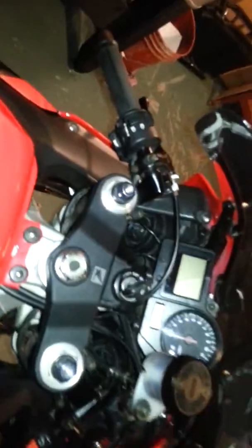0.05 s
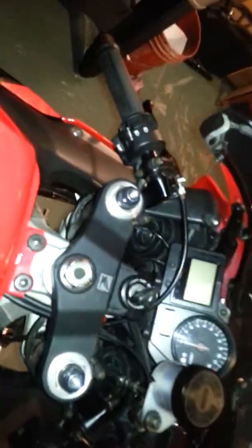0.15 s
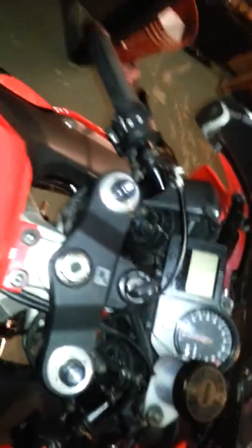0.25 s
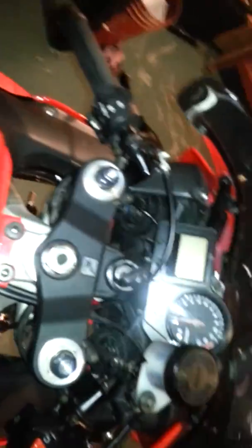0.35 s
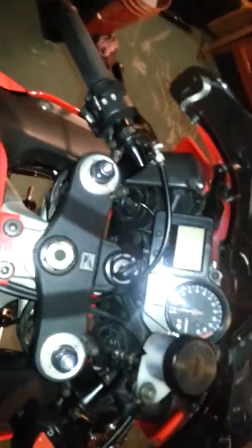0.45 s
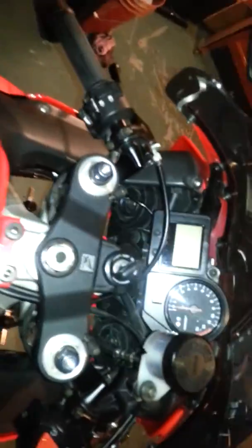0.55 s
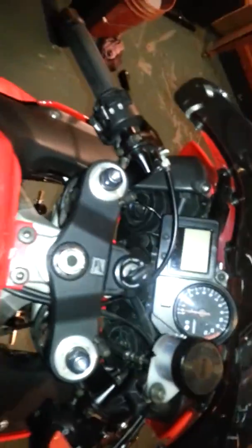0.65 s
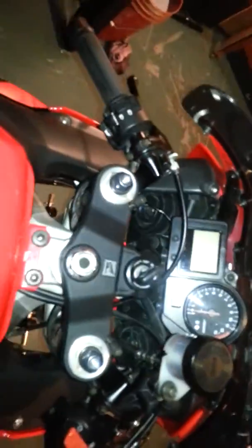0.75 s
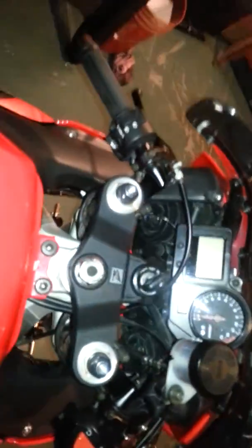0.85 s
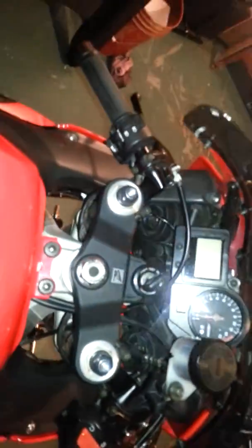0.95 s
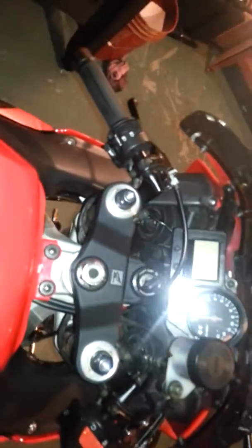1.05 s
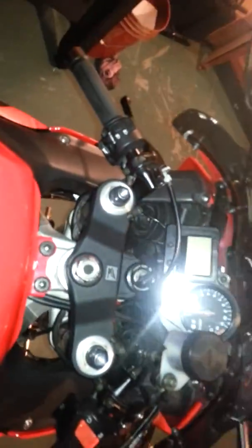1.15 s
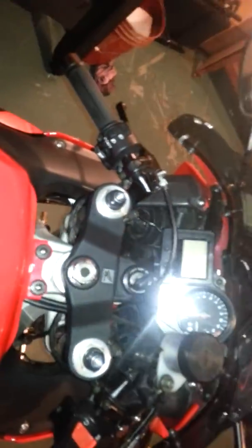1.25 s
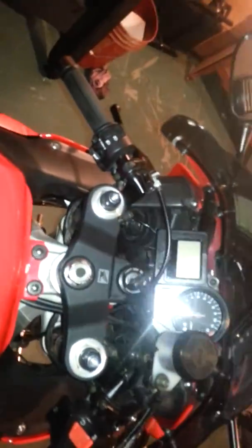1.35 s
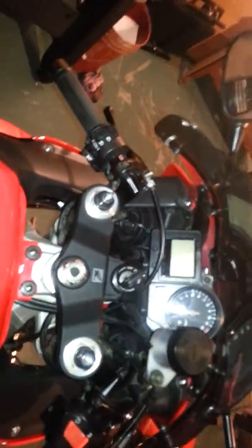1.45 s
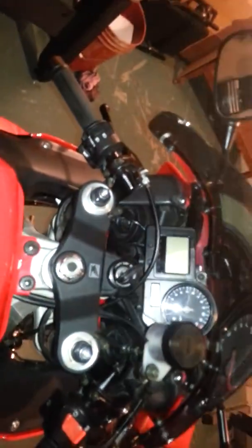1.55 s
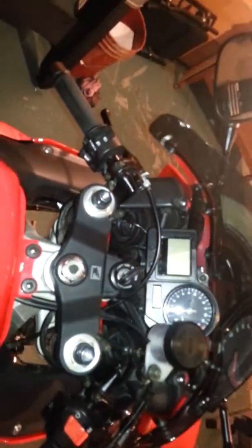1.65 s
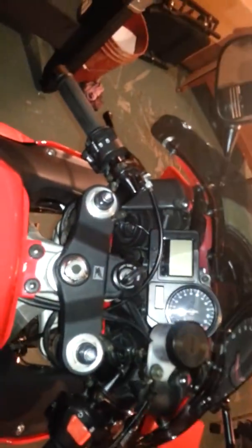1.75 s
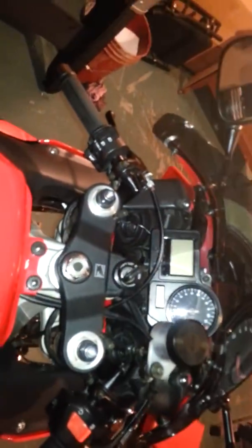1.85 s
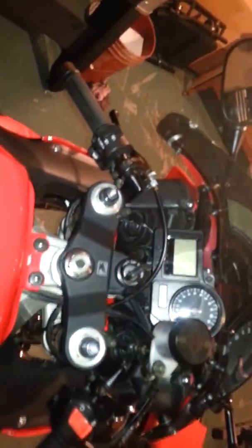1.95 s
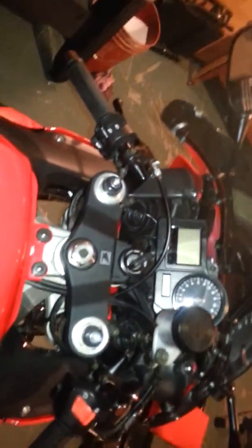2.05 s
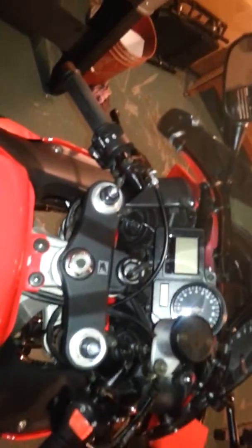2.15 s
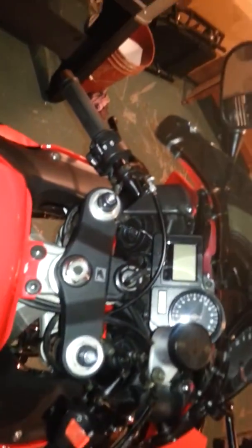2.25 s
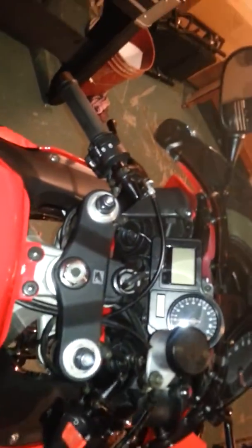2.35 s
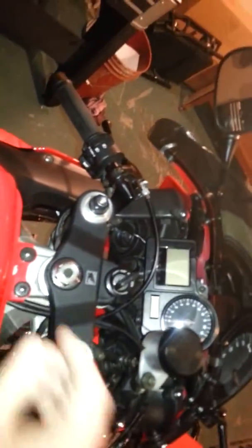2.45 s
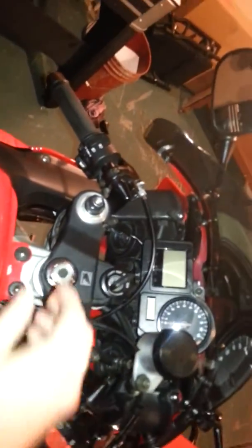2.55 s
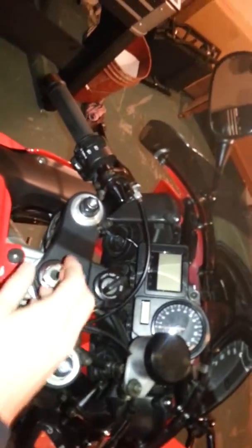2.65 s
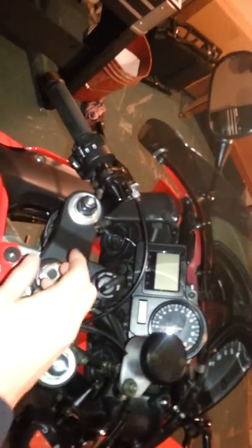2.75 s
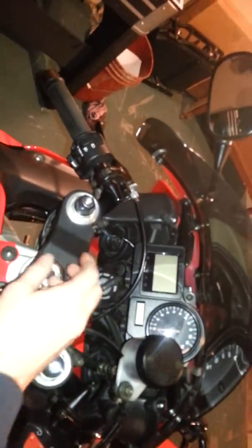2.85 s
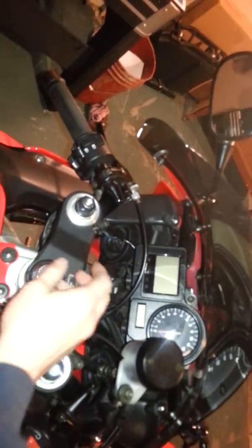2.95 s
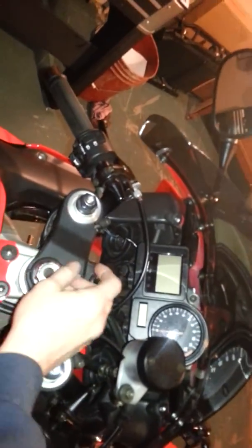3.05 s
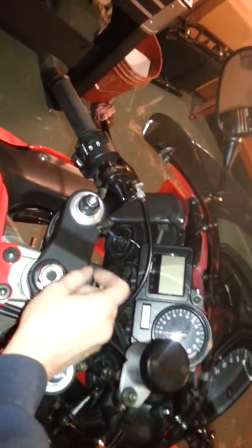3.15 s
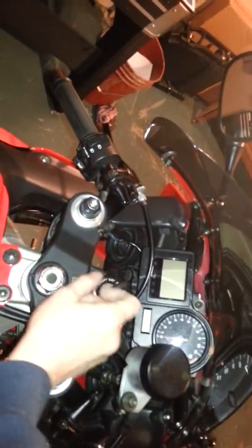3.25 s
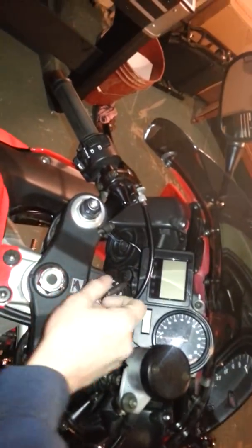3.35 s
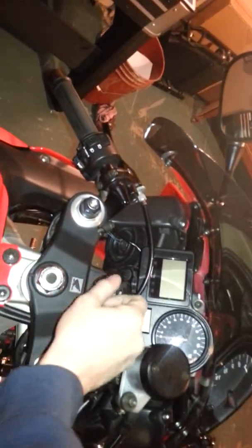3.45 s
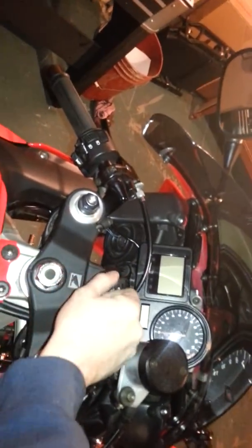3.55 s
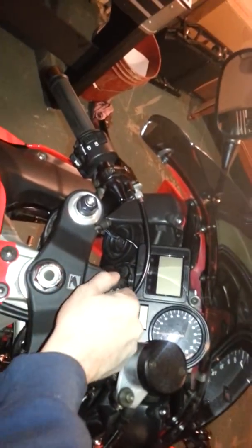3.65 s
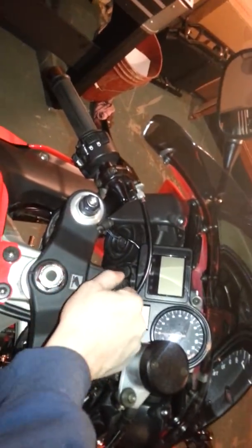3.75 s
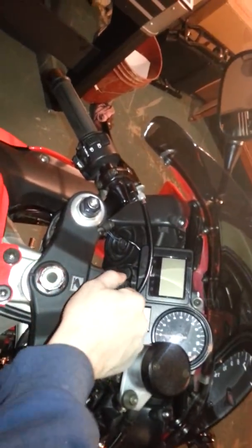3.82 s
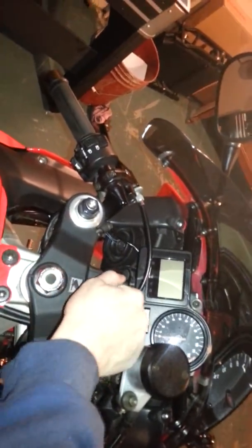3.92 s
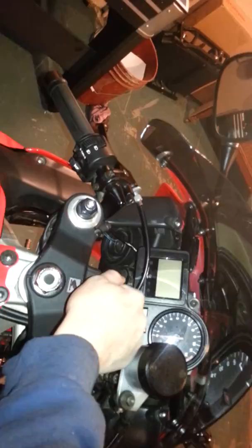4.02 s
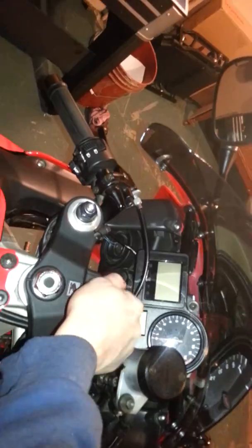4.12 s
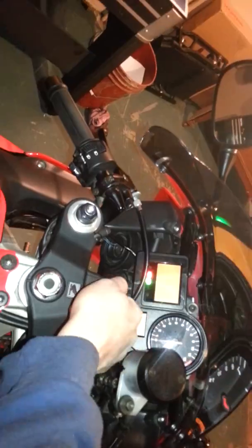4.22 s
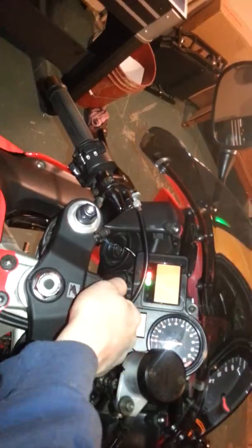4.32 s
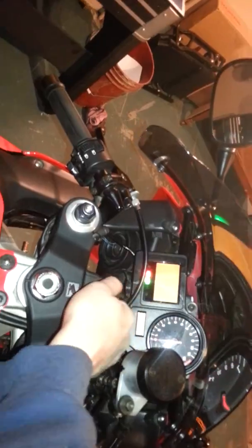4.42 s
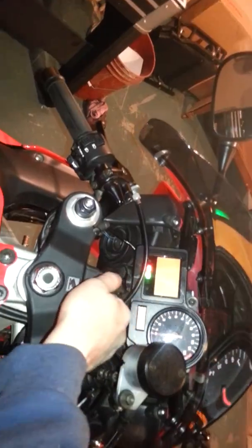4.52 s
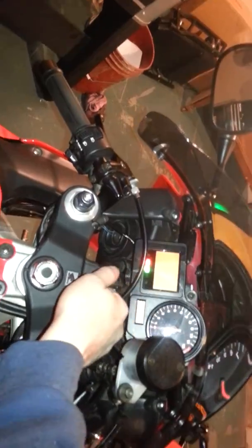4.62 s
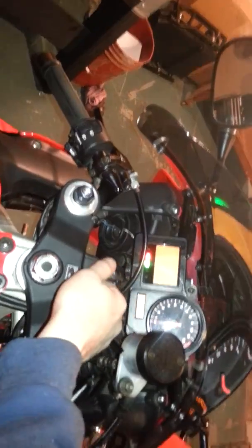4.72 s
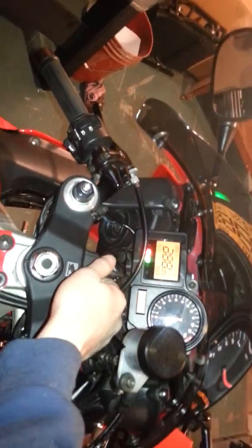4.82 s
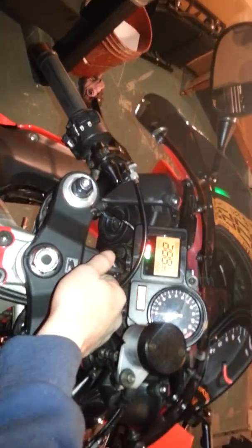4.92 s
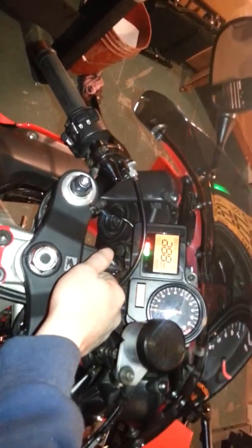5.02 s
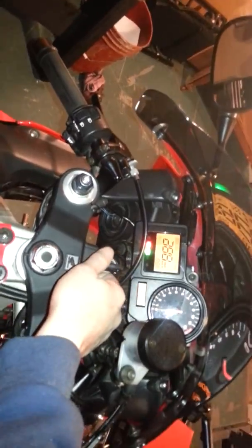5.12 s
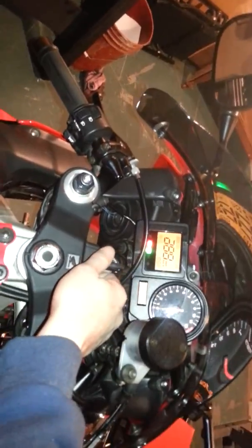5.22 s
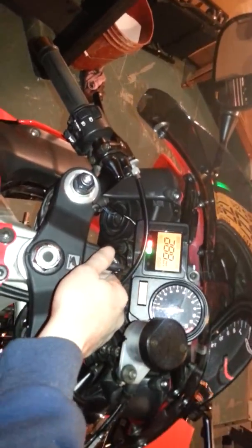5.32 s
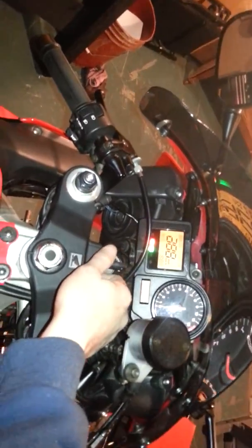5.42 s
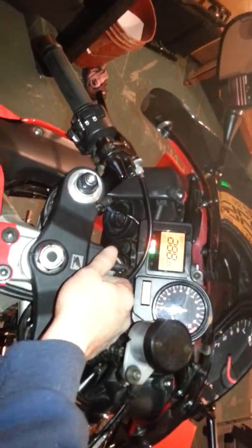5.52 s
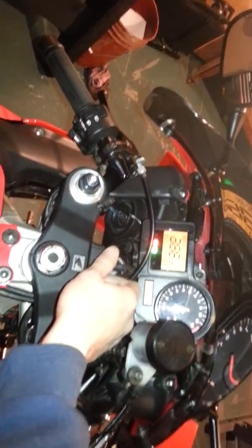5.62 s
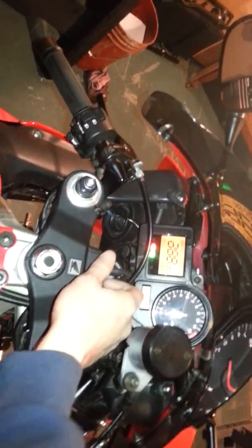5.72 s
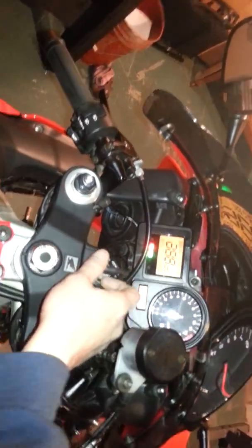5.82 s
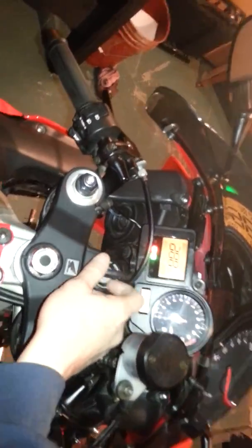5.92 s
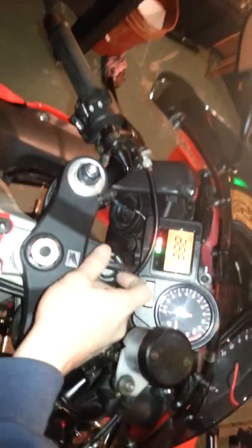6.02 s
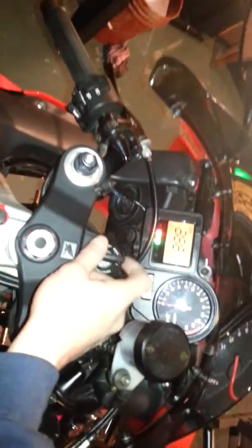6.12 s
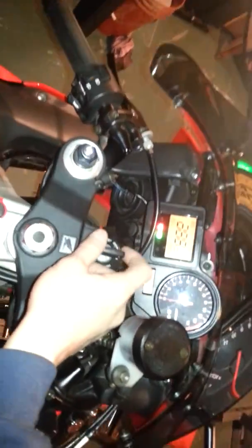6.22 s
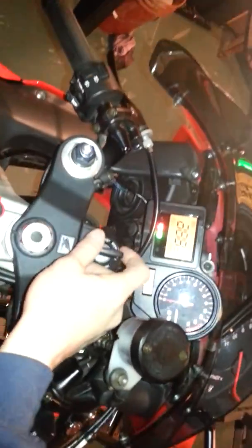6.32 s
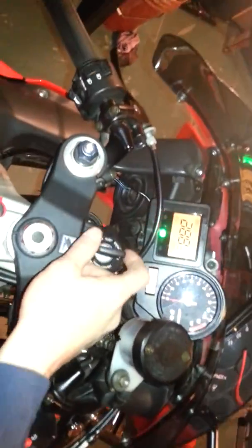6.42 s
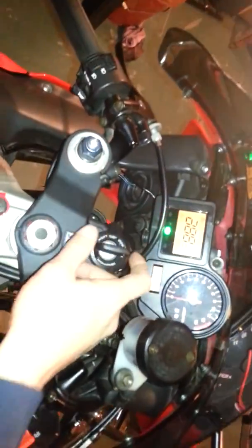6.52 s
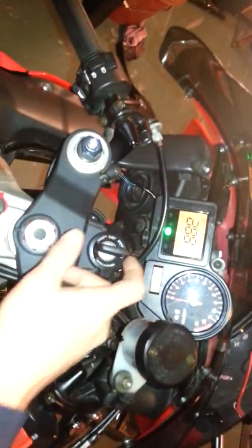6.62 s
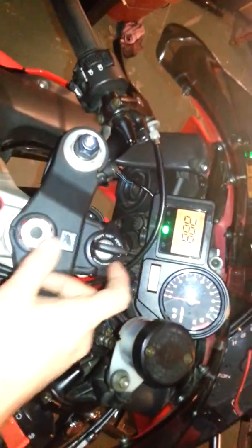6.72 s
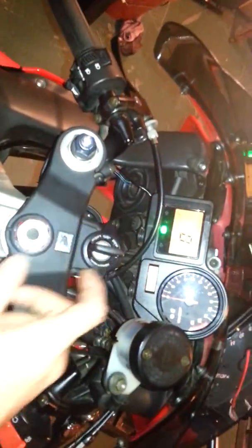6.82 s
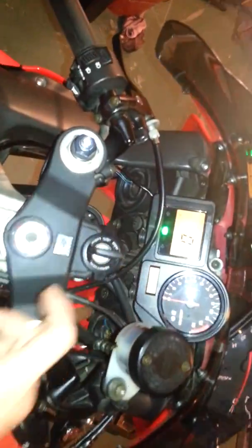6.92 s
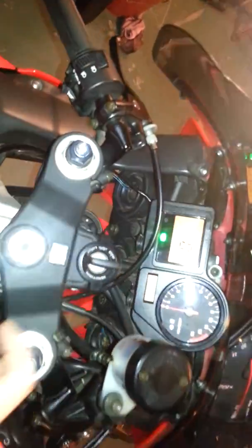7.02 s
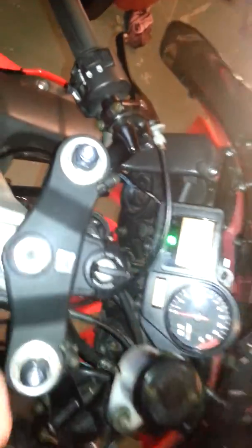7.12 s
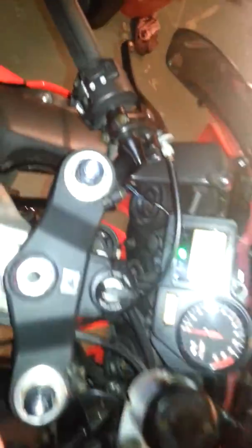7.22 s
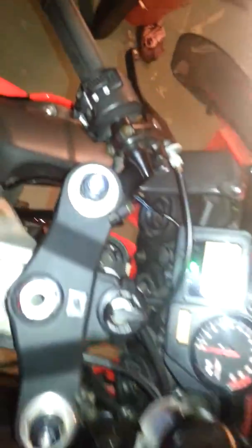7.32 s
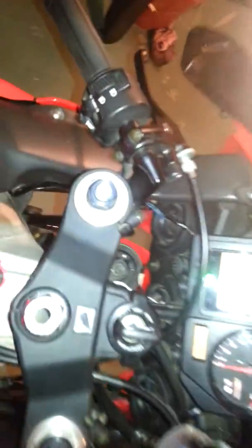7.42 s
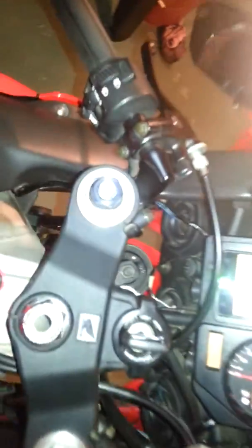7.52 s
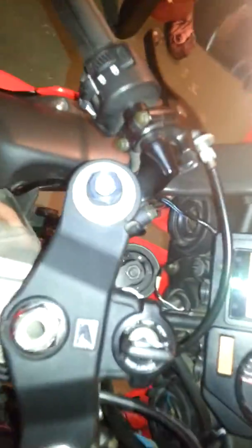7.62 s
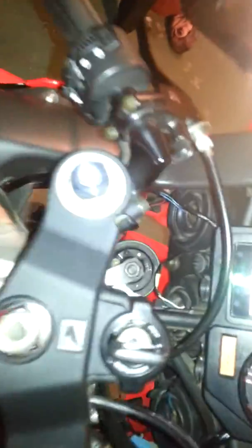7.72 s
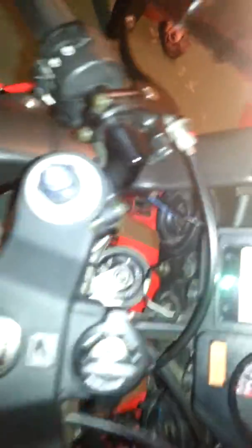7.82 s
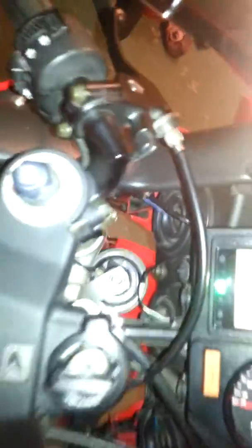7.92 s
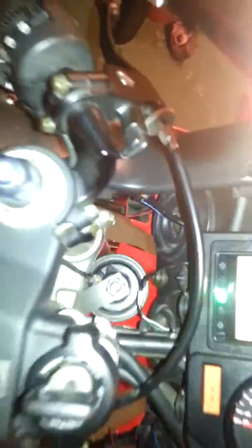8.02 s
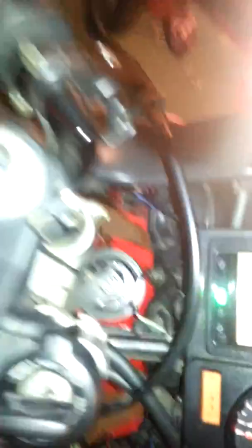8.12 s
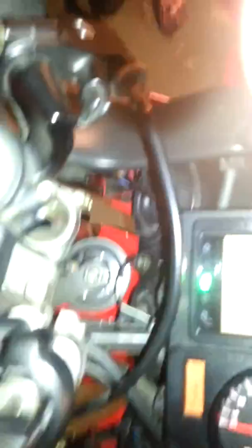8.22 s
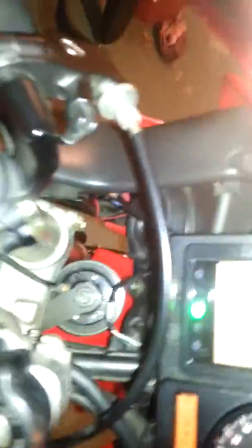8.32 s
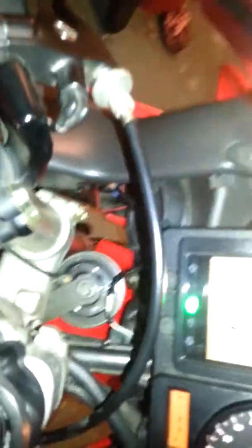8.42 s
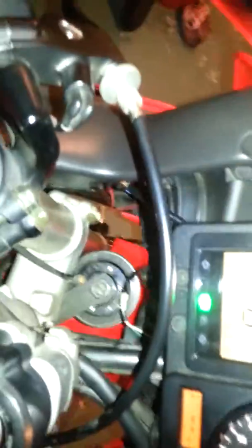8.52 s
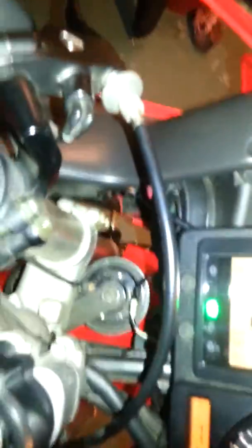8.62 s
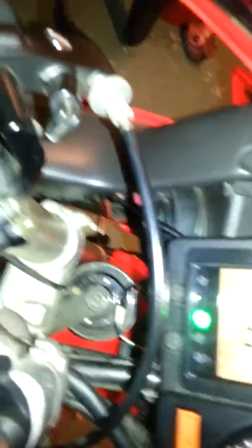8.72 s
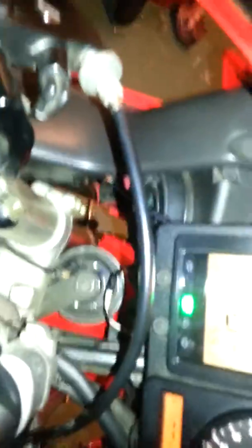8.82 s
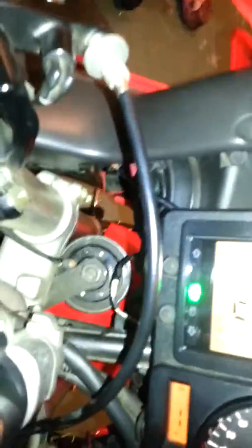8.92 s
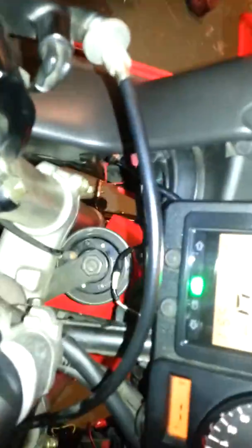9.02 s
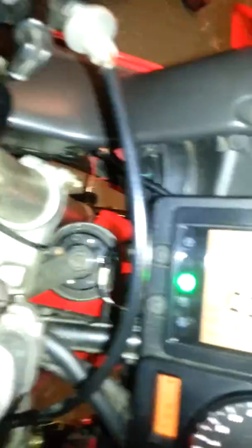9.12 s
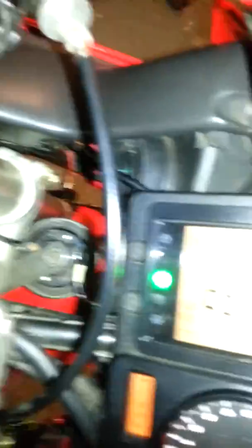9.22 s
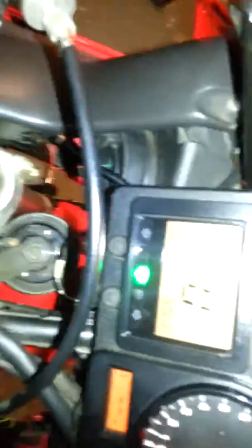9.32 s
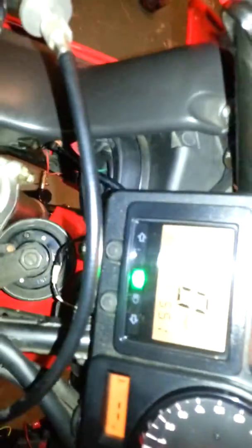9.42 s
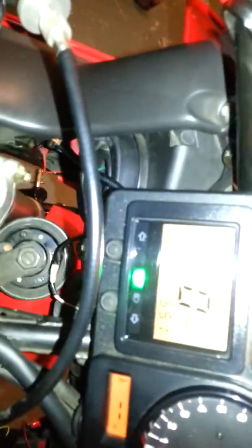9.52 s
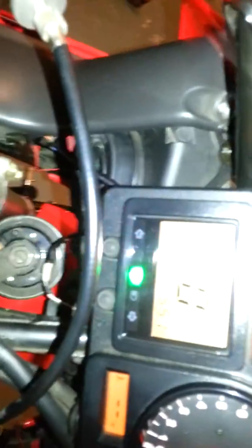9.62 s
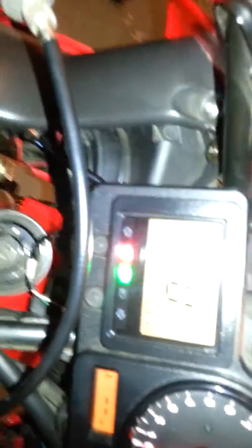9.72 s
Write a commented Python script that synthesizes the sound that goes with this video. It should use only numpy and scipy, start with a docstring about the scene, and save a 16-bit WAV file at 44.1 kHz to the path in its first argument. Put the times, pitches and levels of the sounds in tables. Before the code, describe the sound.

Phone-case rubbing and clicks, then a key turns and a motorcycle fuel pump whines for two seconds and runs down before more handling noise.

```python
"""A quiet garage: a hand turns a motorcycle's ignition key; a phone with two microphone ports listens.
The electric fuel pump spins up, whines and runs down: sines at multiples of its shaft rate, with echoes.
Fuel churns as shaped noise; key and lock are cracks of noise that ring a set of modes.
Close to the microphones, fingers slide over the phone's case in grainy noise; it ticks and creaks.
Behind it all lie a low rumble from the holding hand, a faint hush and two fuzzy tones."""
import sys
import numpy as np
from scipy import signal
from scipy.io import wavfile
from scipy.ndimage import uniform_filter1d

SR = 44100
rng = np.random.default_rng(int(sys.argv[2]) if len(sys.argv) > 2 else 0)


def master_out(mix):
    """Clip the mix to full scale and print it as 16-bit PCM to the path in sys.argv[1]."""
    frames = np.transpose(np.atleast_2d(mix))
    ceiling = np.clip(frames, -1, 1)
    pcm = np.round(ceiling * 32767).astype(np.int16)
    wavfile.write(sys.argv[1], SR, pcm)


N = 430416
T = np.arange(N) / SR

# Pump: strong shaft orders, namely the commutator tone, its octave and the impeller blade tone
# (multiple of the shaft rate)
LOUD_ORDERS = (8, 16, 47)
# Pump: weaker shaft orders before fading, {multiple of the shaft rate: (left level [dB], right level [dB])}
WEAK_ORDERS = {2: (-67, -66), 4: (-58, -59), 24: (-71, -62), 32: (-72, -60), 43: (-65, -64), 44: (-61, -58),
               45: (-65, -53), 46: (-69, -59), 48: (-58, -51), 49: (-64, -57), 50: (-72, -65),
               94: (-82, -74), 141: (-75, -63), 142: (-83, -70)}
# Pump: the shaft orders from 25 to 42 are faintly there, at (left, right) middle levels [dB]
FINE_ORDERS, FINE_DB = range(25, 43), (-78, -71)
# Pump: two tones that come and go at each port as the phone sways
# (time [s], commutator octave left [dB], right [dB], blade tone left [dB], right [dB])
SWAY = [(4.43, -59, -59, -74, -56), (4.465, -61, -56, -55, -44.5), (4.5, -60, -50, -47, -41.5),
        (4.56, -65, -58, -44, -35), (4.61, -75, -55, -53, -44.5), (4.8, -85.5, -54.5, -58, -41.5),
        (5.18, -78, -60, -48.5, -65), (5.42, -81, -58, -47.5, -51), (5.62, -62, -57.5, -39, -39.5),
        (5.84, -71, -73, -45, -36), (5.96, -51, -79, -47, -37.5), (6.07, -52.5, -66, -60, -39),
        (6.18, -48.5, -59, -50.5, -48), (6.43, -46.5, -52, -46, -41), (6.46, -51.5, -49, -45.5, -46),
        (6.56, -66, -74, -74, -68)]
# Pump: gets current, loses it, and is too slow to sing
ON_S, OFF_S, REST_S = 4.385, 6.432, 6.56
# Pump: time scale and curve of the spin-up; time to coast to half speed
SPIN_UP_S, SPIN_UP_SHAPE, COAST_S = .064, 1.5, .055
# Pump: fuel pressure builds and pulls the shaft down to its loaded turns per second
LOADED_RPS, SAG_RPS, SAG_S = 92.35, 1.86, 1.0
# Pump: commutator tone; its gain under full pressure and at standstill
HUM_DB, HUM_LOAD_DB, HUM_SLOW_DB = -52, 5, -23
# Pump: the overtones of the blade tone grow with the pressure
OVERTONE_LOAD_DB = 14
# Tank wall: a narrow mode
WALL_HZ, WALL_WIDTH_HZ = 4350, 7

# Fuel churning in the tank (time [s], rush level [dB], low boom level [dB])
CHURN = [(4.425, -58, -52), (4.439, -58, -46), (4.49, -48.5, -39.5), (4.53, -50, -53), (4.7, -51.5, -65),
         (6.4, -52, -62), (6.45, -52, -50.5), (6.51, -56, -49), (6.6, -61, -51.5), (6.85, -69, -69)]
# Spectrum of the rush (frequency [Hz], relative level [dB per Hz])
RUSH_SPECTRUM = [(150, -17), (400, -2), (1100, -3.5), (2500, -0.5), (4200, 5), (5600, -8), (14500, -9.5)]
# Low resonances of the tank (frequency [Hz], width [Hz], relative level [dB])
TANK_MODES = [(281, 130, -2.5), (527, 360, -25), (1010, 67, -12)]

# Key and lock clicks (time [s], nominal peak [dB], treble re level [dB], crack [ms], ring re level [dB],
# pitch of the part struck [Hz])
KEY_CLICKS = [(3.047, -30.5, -8, 1.4, -5, 1300), (3.083, -23, -18, 2.5, -1, 1110),
              (3.254, -43.5, 4, 0.66, -3, 1612), (4.05, -42, 4, 3.2, 13, 8500),
              (4.065, -39.5, -2, 4.6, -6, 4200), (4.09, -38, -10, 1.7, -10, 3200),
              (4.102, -42, -4, 3.2, 7, 3300), (4.195, -19, 2, 3.8, -5, 700)]
# Ringing of the lock (frequency [Hz], relative level [dB], t60 [s])
LOCK_MODES = [(363, -1, 0.24), (645, -1.5, 0.15), (700, -2, 0.15), (1020, -13, 0.27), (1137, 4.5, 0.028),
              (1610, 9, 0.025), (3350, 4, 0.024), (4070, -2, 0.05), (8500, 9, 0.012)]

# Finger strokes (time of the middle [s], length [ms], level [dB], left-right [dB],
# then re that level: upper middle [dB], treble [dB], bass [dB])
STROKES = [(0.134, 36, -57.5, -25, 12, 12, -8), (0.18, 82, -56.5, -27, 7, 6, 1),
           (0.413, 78, -49.5, -11, -5, -11, -1), (0.478, 89, -39, -29, 4, 1.5, -6),
           (0.721, 100, -54.5, -25, 5, 4, -0.5), (0.954, 118, -52.5, -25, -5.5, -20, -1.5),
           (1.026, 59.26, -47.5, -25, 0, -5.5, -7), (1.205, 27, -43.5, -23, -2, -7, -24),
           (1.264, 66.96, -48, -21, 0.5, -4, -11), (1.391, 104, -44.5, -33, 0.5, -1.5, -12.5),
           (1.56, 122, -40.5, -33, -1.5, -5, -14), (1.623, 99, -31.5, -37, -1.5, -3, -11),
           (1.731, 83, -38, -36, 0, -5.5, -11.5), (1.836, 22.22, -59, -25, 11, -10, -10),
           (1.924, 39.81, -53, -21, 3, -4, 2), (2.05, 68.6, -53, -12, 3.5, -3, 3.5),
           (3.85, 79.7, -68.5, -4, -1, -4, 14.5), (3.96, 140.4, -66, -4.5, 4, -2, 7),
           (7.034, 111.2, -59, -25, 3.5, -1, -3), (7.846, 23.76, -45, -11, -5, -11, 3),
           (7.92, 79.92, -48, -10, -0.5, -7, -5.5), (7.933, 27.78, -47.5, 25, 4, -16, -10),
           (8.173, 37.6, -33.5, -18, 0, -7, -12), (8.22, 55, -44.5, -8, -7.5, -14, -9),
           (8.325, 86, -53.5, -1, -2, -9, -2), (8.447, 96, -38.5, -12.5, -3, -6.5, -7.5),
           (8.58, 100, -50.5, 6, 2, 3, 3.5), (8.641, 46, -36, -20, -6.5, -17, -7),
           (8.704, 51, -44, 25, 5.5, 3.5, 9), (8.713, 66.67, -42.5, -25, -12, -11, 1.5),
           (8.876, 59.5, -41, -25, 3.5, 0, -2.5), (9.01, 83.33, -56, 3, 5, 6, -10),
           (9.103, 138, -47, -18, 1, 2, -6.5), (9.306, 94, -45, -29, -0.5, 2.5, -6.5),
           (9.68, 140, -62.5, 7, 5.5, 7.5, 3)]
# Bands of a stroke: middle, upper middle, treble, bass (from [Hz], to [Hz])
STROKE_BANDS = [(1520, 2590), (2730, 5090), (6360, 8880), (170, 1100)]
# Each band of a stroke wavers on its own as the skin catches and lets go
UNEVEN_DB, UNEVEN_S = 1.4, .015
# Hand that holds the phone (time [s], low rumble [dB], faint steady rubbing by the right port [dB])
GRIP = [(0, -59.5, -62.5), (1.9, -59, -57), (2.3, -62.5, -79), (4.2, -62, -67), (4.8, -70, -72),
        (6.3, -66, -73), (7.7, -64, -93), (8.1, -59.5, -59.5), (8.7, -57, -48.5), (9.76, -61, -60.5)]

# Ticks of the case (nominal time [s], nominal peak [dB], treble re level [dB], bass re level [dB])
TICKS = [(0.389, -49.5, -12, 16), (0.631, -55.5, 31, -30), (1.091, -49, -5, 7), (1.116, -52, 12, 12),
         (1.3848, -38.5, 5, 0), (1.6112, -23.5, 7.5, 15.5), (1.619, -22, 2, -12), (1.665, -41.5, 16, -23),
         (2.1108, -53, 3, 16.5), (2.169, -56.5, 3, 10), (3.014, -49, -15, 15.5), (4.5825, -25, 0.5, -5),
         (5.5836, -33, -10, 6.5), (6.54, -42.5, -12, 13), (6.9131, -42.5, 12.5, -3),
         (7.0232, -25.5, 2.5, -0.5), (7.7682, -26, 5.5, 0), (7.8452, -33, 0, -11), (7.8785, -23, 5, 1.5),
         (7.9668, -25, 2, 1.5), (8.059, -47.5, -8, -5), (8.295, -40.5, -4, 3), (8.366, -48, -5, 5),
         (9.1403, -36, -10, -32), (9.549, -55.5, 15, -26), (9.6696, -35, 9, 1)]
# Ringing of the case (frequency [Hz], relative level [dB], t60 [s])
TICK_MODES = [(1110, 5, 0.0038), (2286, 13, 0.0026), (3750, 9, 0.0018), (6940, -26, 0.009)]
TICK_FAR_DB = -27.5  # the left port lies far from the seam that ticks
# Creak of the case (time [s], pitch [Hz], level [dB])
CREAK = [(9.261, 1360, -45), (9.268, 1170, -43.5), (9.277, 696, -39.5), (9.291, 636, -47),
         (9.297, 270, -54), (9.318, 239, -56)]

# Spectrum of the hand's rumble (frequency [Hz], relative level [dB per Hz])
RUMBLE_SPECTRUM = [(20, -15), (50, -6.5), (100, -4), (119, -0.5), (140, -1), (200, -12), (320, -26.5)]
# Spectrum of the hush (frequency [Hz], relative level [dB per Hz])
HUSH_SPECTRUM = [(120, -33), (200, 2), (509, -5), (556, -7), (1270, -13.5), (1630, -12), (2260, -17),
                 (4310, -17), (5640, -21), (14600, -20)]
HUSH_DB = -60.5
# Likeness of the hush at the two ports (frequency [Hz], correlation)
HUSH_SAME = [(60, 0.2), (380, 0.2), (2380, 0.021), (15000, 0.03)]
# Balance of the hush (frequency [Hz], left-right [dB])
HUSH_TILT = [(60, 3), (240, -1.5), (950, 1.5), (3770, -11.5), (15000, -9.5)]
# Fuzzy tones that hang in the quiet (frequency [Hz], width [Hz], level [dB], heard from [s])
FAINT_TONES = [(1570, 54, -65, 8.5), (4350, 90, -71.5, 2)]

# Echo of the garage (frequency [Hz], t60 [s])
GARAGE_T60 = [(250, 0.81), (1000, 0.49), (4000, 0.36), (12000, 0.19)]
EDGE_HZ = 14550  # upper band limit of the phone


def amp(db):
    """Turns decibels into a factor of amplitude."""
    return 10 ** (np.asarray(db) / 20)


def evened(x):
    """Scales each row to rms 1."""
    return x / np.sqrt(np.mean(x ** 2, axis=-1, keepdims=True) + 1e-20)


def read(points, hz):
    """Reads a curve of (frequency, value) points along a logarithmic frequency axis."""
    point_hz, value = np.transpose(points)
    return np.interp(np.log(hz + 1), np.log(point_hz + 1), value)


def add(mix, s, sound):
    """Lays a two-port sound into the mix at s seconds, cut off at the end of the mix."""
    part = mix[:, round(s * SR):][:, :sound.shape[1]]
    part += sound[:, :part.shape[1]]


def butter(x, order, hz, kind):
    """Butterworth filter."""
    return signal.sosfilt(signal.butter(N=order, Wn=hz, btype=kind, fs=SR, output="sos"), x)


def band(x, lo_hz, hi_hz):
    """Band of a sound, scaled to rms 1."""
    return evened(butter(x, 3, [lo_hz, hi_hz], "band"))


def resonate(x, hz, width):
    """Shifts hz down to zero, smooths, and shifts back: a resonance of gain 1."""
    turn = np.exp(2j * np.pi * np.cumsum(hz * np.ones(x.shape[-1])) / SR)
    r = np.exp(-np.pi * width / SR)
    return 2 * (turn * signal.lfilter([1 - r], [1, -r], x / turn)).real


def ring(modes, weights_db, t):
    """Struck solid: a sum of dying sines."""
    total = 0
    for (hz, db, t60), weight_db in zip(modes, weights_db):
        total = total + amp(db + weight_db - 60 * t / t60) * np.sin(2 * np.pi * hz * t)
    return total


def wander(t, top_hz):
    """Slow random drift of rms 1, different at each port: a sum of slow sines."""
    hz = np.geomspace(.6, top_hz, num=10)[:, None]
    sines = np.sin(2 * np.pi * (hz * t + rng.random((2, 10, 1))))
    return evened((sines / np.sqrt(hz)).sum(axis=1))


def coloured(spectrum, same, tilt, patchy_db):
    """Noise at two ports from random short-time spectra whose level varies in patches."""
    frames, hz = N // 256 + 5, np.fft.rfftfreq(1024, 1 / SR)
    a, b, c, d, patches = rng.standard_normal((frames, 513, 5)).T
    patches = uniform_filter1d(uniform_filter1d(patches, size=12, axis=0), size=14, axis=1)
    level_db = read(spectrum, hz)[:, None] + patchy_db * patches / patches.std()
    same = np.clip(read(same, hz), -1, 1)[:, None]
    half_tilt = amp(read(tilt, hz)[:, None] / 2)
    left = a + 1j * b
    right = same * left + np.sqrt(1 - same ** 2) * (c + 1j * d)
    z = np.array([left * half_tilt, right / half_tilt]) * amp(level_db)
    x = signal.istft(z, nperseg=1024, noverlap=768)[1][:, :N]
    return x / x.mean(axis=0).std()


def garage(x):
    """Sparse echoes of random sign, each band dying at its own speed, other ones at each port."""
    taps = np.zeros((2, SR // 2))
    at = np.arange(200, SR // 2 - 20, 20) + rng.integers(0, 20, (2, (SR // 2 - 201) // 20))
    np.put_along_axis(taps, at, rng.choice([-1., 1.], at.shape), 1)
    hz, t, z = signal.stft(taps, SR, nperseg=256)
    tail = signal.istft(z * amp(-60 * t / read(GARAGE_T60, hz)[:, None]), SR, nperseg=256)[1]
    return signal.oaconvolve(x, tail / np.linalg.norm(tail[0]), axes=1)[:, :N]


def pump():
    """Shaft orders as sines on one turning angle; tones fade in and out at each port as the phone sways."""
    s, *sway_db = np.transpose(SWAY)
    t = np.arange(s[0], REST_S, 1 / SR)
    load = 1 - np.exp(-(np.minimum(t, OFF_S) - ON_S) / SAG_S)
    spin_up = 1 - np.exp(-((t - ON_S) / SPIN_UP_S) ** SPIN_UP_SHAPE)
    spin = spin_up / (1 + np.maximum(t - OFF_S, 0) / COAST_S)
    slow = 1 - spin
    angle = 2 * np.pi * np.cumsum(spin * (LOADED_RPS + SAG_RPS * (1 - load))) / SR

    hum_db = HUM_DB + HUM_LOAD_DB * load + HUM_SLOW_DB * slow + np.zeros((2, 1))
    octave_db, blade_db = np.reshape([np.interp(t, s, c) for c in sway_db], (2, 2, -1))
    tones = 0
    for k, db in zip(LOUD_ORDERS, [hum_db, octave_db, blade_db]):
        # short waves reach the ports out of step
        apart = np.array([[0], [np.exp(-400 / k ** 2) * np.pi / 2]])
        # off speed the rotor judders, in level and in phase
        shake = evened(uniform_filter1d(rng.standard_normal((2, len(t))), size=260))
        level = amp(db + 28 * np.clip(slow, 0, .25) * shake)
        tones = tones + level * np.sin(k * angle + apart + 6.5 * slow * shake[::-1])

    for k, db in WEAK_ORDERS.items():
        short = np.exp(-400 / k ** 2)  # near 1 for short waves, which differ more between the ports
        fade = np.repeat(wander(t[::100], top_hz=3), 100, axis=1)[:, :len(t)]
        fade_db = (1 + 3 * short) * uniform_filter1d(fade, size=100)
        level = amp(np.array(db)[:, None] + fade_db - 18 * slow - 2 * short)
        if k > 1.5 * LOUD_ORDERS[-1]:  # an overtone of the blade tone
            level = level * amp(OVERTONE_LOAD_DB * (load - .55))
        phase = 2 * np.pi * (rng.random() + short * rng.random((2, 1)))
        tones = tones + level * np.sin(k * angle + phase)

    for k in FINE_ORDERS:
        level = amp(np.array(FINE_DB)[:, None] + 3 * rng.standard_normal((2, 1)) - 30 * slow)
        tones = tones + level * np.sin(k * angle + 2 * np.pi * rng.random((2, 1)))
    out = np.zeros((2, N))
    add(out, s[0], np.sqrt(2) * tones * signal.windows.tukey(len(t), .01))
    return out


def pump_echo(whine):
    """The high tones fill the garage, and a narrow mode of the tank wall rings on after the blade tone."""
    treble = butter(whine, 2, 2500, "high")  # the low hum is close and steady
    return amp(-14) * garage(treble) + amp(-3) * resonate(whine, WALL_HZ, WALL_WIDTH_HZ)


def churn():
    """A wide rush of fuel, and a boom in the tank's low resonances at start and stop."""
    s, rush_db, boom_db = np.transpose(CHURN)
    same, tilt = [(300, 0.17), (1400, 0)], [(500, 9.5), (2000, -5), (9000, -4.5)]
    rush = coloured(RUSH_SPECTRUM, same, tilt, patchy_db=1.5)
    boom = sum(amp(db) * resonate(rng.standard_normal(N), hz, width) for hz, width, db in TANK_MODES)
    boom = band(boom, 154, 1560)  # the same at both ports
    rush_level = amp(np.interp(T, s, rush_db, -140, -140))
    boom_level = amp(np.interp(T, s, boom_db, -140, -140))
    return rush_level * rush + boom_level * boom


def key():
    """Each click is a crack of noise plus the lock's ringing, strongest near the pitch of the part struck."""
    out, t = np.zeros((2, N)), np.arange(SR // 4) / SR
    lock_hz = np.transpose(LOCK_MODES)[0]
    for s, db, treble_db, crack_ms, ring_db, hz in KEY_CLICKS:
        noise = rng.standard_normal((2, len(t)))
        u = 1000 * t / crack_ms
        crack = band(noise, 364, 3900) + amp(treble_db) * band(noise, 4700, 13600)
        crack = crack * u * np.exp(1 - u)  # swells to its peak after crack_ms, then dies
        weights_db = -13 * abs(np.log2(lock_hz / hz))
        ringing = amp(ring_db) * np.minimum(u, 1) * ring(LOCK_MODES, weights_db, t)
        add(out, s, amp(db - 7.5) * (crack + ringing) * amp([[-3], [3]]))  # stronger at the right port
    return out + amp(-8) * garage(out)


def fingers():
    """Skin slips over the case in fine grains; each stroke swells and fades, with its own port balance."""
    grain_db = 1.37 * evened(uniform_filter1d(rng.standard_normal((2, N)), size=60))
    grit = rng.standard_normal((2, N)) * amp(grain_db)
    parts = np.array([band(grit, lo_hz, hi_hz) for lo_hz, hi_hz in STROKE_BANDS])
    parts[2] += .55 * band(grit, 8800, 14500)  # a thin hiss lies above the treble band

    power = np.zeros((4, 2, N))  # band, port, time
    s, _, steady_db = np.transpose(GRIP)
    power[:, 1] = amp(np.interp(T, s, steady_db) + np.array([[0], [1], [-4], [-5]])) ** 2
    for s, length_ms, db, pan_db, *relative_db in STROKES:
        near = slice(max(round((s - .3) * SR), 0), round((s + .3) * SR))
        ms = 1000 * (T[near] - s)
        port_db = np.minimum([[pan_db], [-pan_db]], 0)  # only the far port is weakened
        shape_db = db - 6 * abs(2 * ms / length_ms) ** 3.94 + port_db
        power[:, :, near] += amp(shape_db + np.array([0, *relative_db])[:, None, None]) ** 2

    coarse = rng.standard_normal((4, 2, round(N / SR / UNEVEN_S) + 2))
    steps = np.arange(coarse.shape[-1])
    uneven = np.array([[np.interp(T / UNEVEN_S, steps, c) for c in pair] for pair in coarse])
    close = (np.sqrt(power) * amp(UNEVEN_DB * uneven) * parts).sum(axis=0)
    return close + amp(-21) * garage(close[::-1])  # the echo has the ports swapped


def ticks():
    """A sharp snap rings the case's short modes; the far port hears it weaker."""
    out, t = np.zeros((2, N)), np.arange(1000) / SR
    for s, db, treble_db, bass_db in TICKS:
        snap = -ring(TICK_MODES, (bass_db, 0, treble_db, treble_db), t) * (1 - np.exp(-t / 6e-5))
        snap = butter(snap, 2, 230, "high")  # a small case gives no deep bass
        add(out, s + 0.001117, amp(db + 3.5 + np.array([[TICK_FAR_DB], [0]])) * snap)
    return out


def creak():
    """A slip of falling pitch: a sine roughened by resonant noise, with a noisy overtone."""
    s, hz, db = np.transpose(CREAK)
    t = np.arange(s[0], s[-1], 1 / SR)
    hz, noise = np.interp(t, s, hz), rng.standard_normal(len(t))
    tone = np.sin(2 * np.pi * np.cumsum(hz) / SR)
    rough = 0.8 * evened(resonate(noise, hz, 300))
    overtone = .3 * evened(resonate(noise, 2.6 * hz, 500))
    out = np.zeros((2, N))
    add(out, s[0], amp(np.interp(t, s, db)) * (tone + rough + overtone) * amp([[-1], [3]]))
    return out


def hand_rumble():
    """The hand that holds the phone gives a low rumble: patchy bass noise that follows the grip."""
    s, rumble_db, _ = np.transpose(GRIP)
    same, tilt = [(60, 0.15), (200, 0.17)], [(40, 6.3), (200, 6)]
    return amp(np.interp(T, s, rumble_db)) * coloured(RUMBLE_SPECTRUM, same, tilt, patchy_db=1.9)


def hush():
    """The quiet behind everything: steady shaped noise, and fuzzy tones made by narrow resonances of noise."""
    out = amp(HUSH_DB) * coloured(HUSH_SPECTRUM, HUSH_SAME, HUSH_TILT, patchy_db=0)
    for hz, width, db, since in FAINT_TONES:
        fade_in = np.clip((T - since) / .4, 0, 1)
        out += amp(db) * fade_in * evened(resonate(rng.standard_normal((2, N)), hz, width))
    return out


def scene():
    """Sums the sources at the two ports, from the pump to the quiet behind it."""
    whine = pump()
    machine = whine + pump_echo(whine) + churn() + key()
    handling = fingers() + ticks() + creak() + hand_rumble()
    return machine + handling + hush()


def record(dry):
    """The phone's microphones lose the deep bass; then its band limit cuts the top."""
    thin = butter(dry, 2, 70, "high")
    band_limit = signal.firwin(511, EDGE_HZ, window=("kaiser", 9), fs=SR)
    return signal.oaconvolve(thin, band_limit[None], "same")


dry = scene()
out = record(dry)
master_out(out)
```